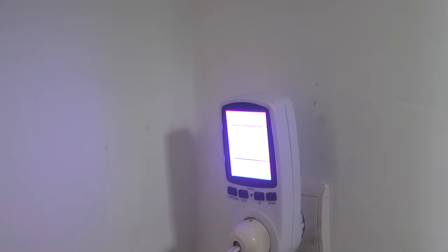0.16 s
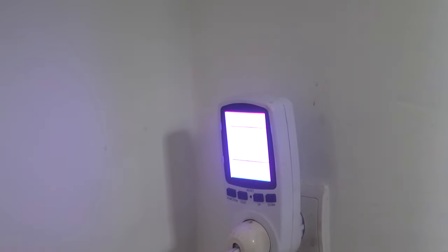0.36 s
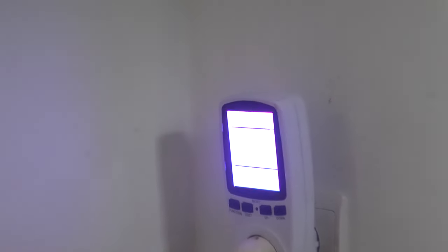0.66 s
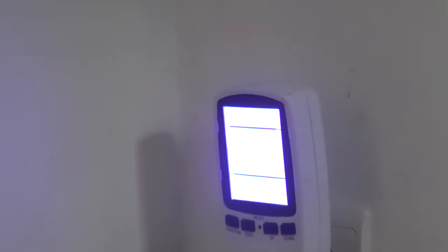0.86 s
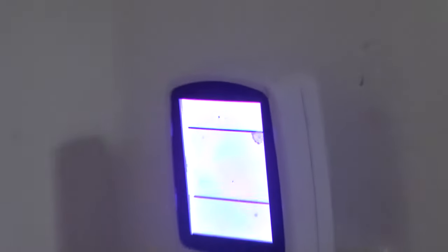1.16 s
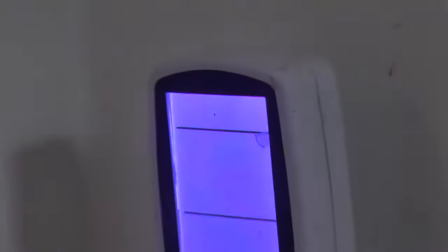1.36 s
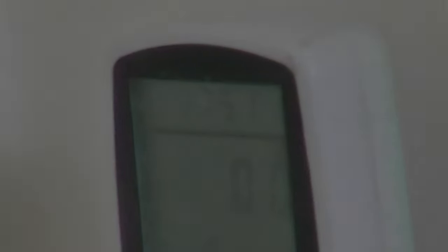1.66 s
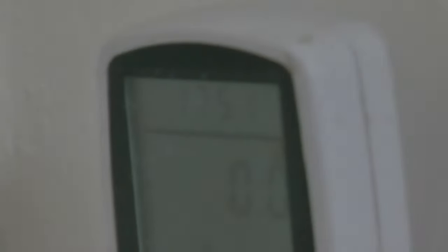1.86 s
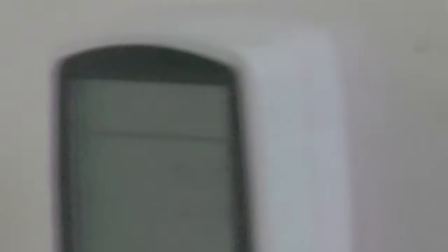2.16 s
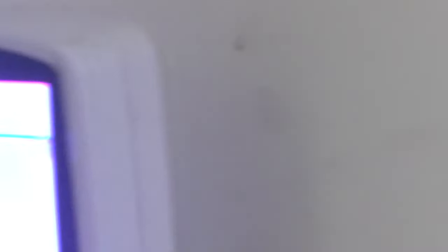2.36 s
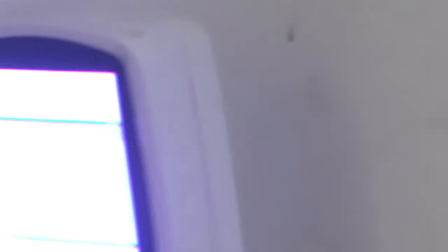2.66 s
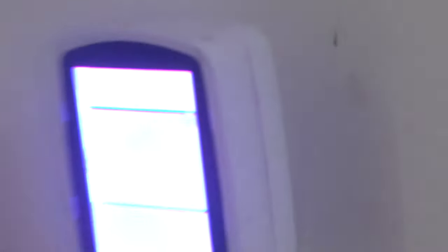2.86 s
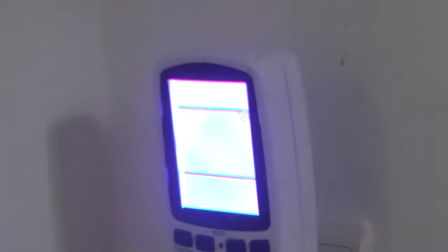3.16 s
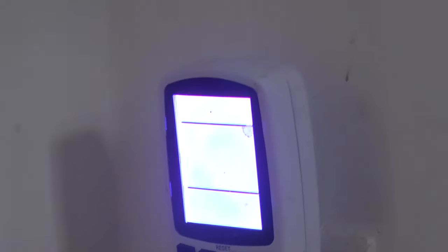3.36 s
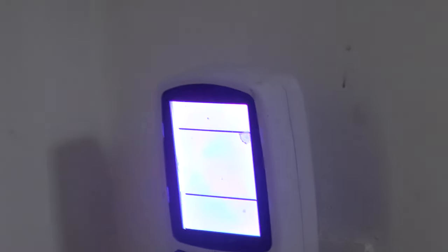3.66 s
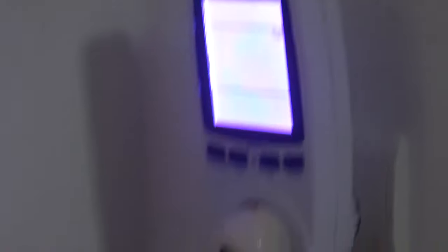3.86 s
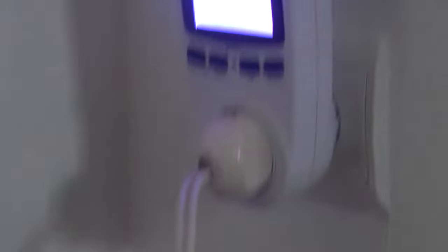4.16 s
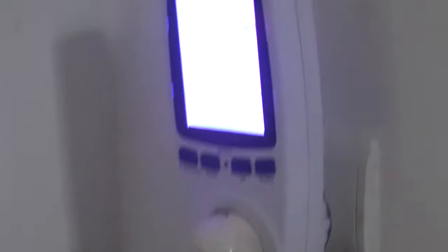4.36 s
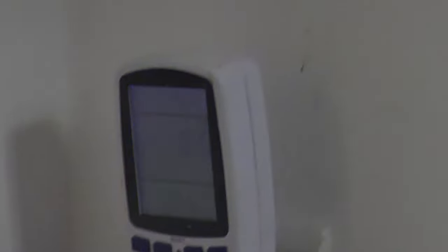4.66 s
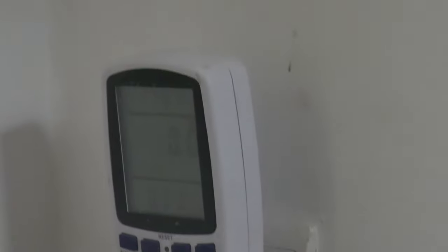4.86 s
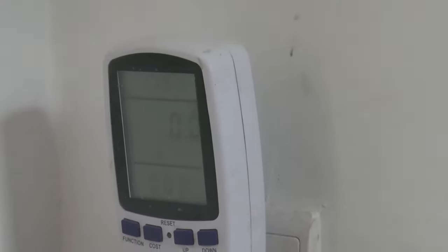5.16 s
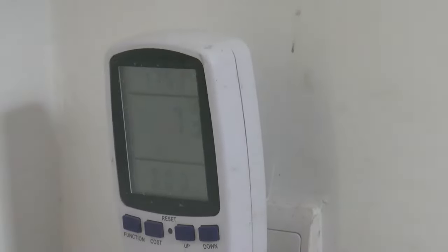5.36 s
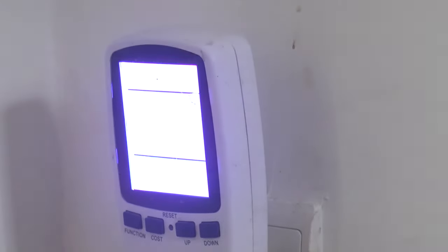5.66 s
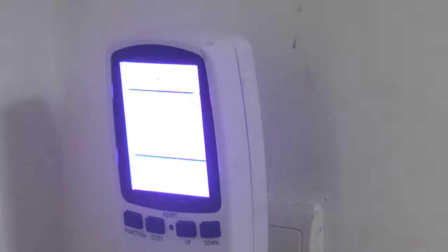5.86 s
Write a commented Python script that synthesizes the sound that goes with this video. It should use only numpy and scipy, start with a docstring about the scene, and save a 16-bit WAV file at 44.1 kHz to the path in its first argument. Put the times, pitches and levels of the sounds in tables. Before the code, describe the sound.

A high electrical whine sits over the steady hum and hiss of a small inverter fan indoors. Heard through a moving hand-held microphone, the whine grows louder, sinks away around the middle, then returns in uneven waves. Right at the microphone there is a soft thump at the start, a few brief plastic clicks, and later several muffled knocks from the hand, while the fan keeps running.

```python
"""A hollow drone, an airy hiss and a shrill whine: the small cooling fan of a power inverter in a room.
Turbulent air hums in a corner, resonates in the case, hisses off the blades and rasps in the grille,
while blades and motor sing on multiples of the shaft speed. A hand-held camera drifts through the
standing waves of the whine, so each tone swells and fades on its own. The hand bumps the camera
softly, and its plastic shell clicks a few times."""
import sys
import numpy as np
from scipy import signal
from scipy.fft import rfft, irfft, next_fast_len
from scipy.io import wavfile
from scipy.ndimage import map_coordinates

SR = 44100
rng = np.random.default_rng(int(sys.argv[2]) if len(sys.argv) > 2 else 0)


def transcribe(signal):
    """Save signal, clipped to [-1, 1], as a 16-bit WAV file at the path in sys.argv[1]."""
    frames = np.atleast_2d(signal).T
    limited = np.clip(frames, -1, 1)
    pcm = np.round(limited * 32767).astype(np.int16)
    wavfile.write(sys.argv[1], SR, pcm)


N = 264996

# The rushing air behind both drone and hiss. Each row: time in seconds, drone level in dB.
AIRFLOW = [(0, -40.5), (1.1, -41.5), (1.6, -42.5), (2.1, -42.5), (2.5, -42), (3, -42.5), (3.6, -42),
           (4.6, -43), (5.4, -41.5), (6, -44.5)]
# The lower whine's standing wave at the moving microphone. Each row: time in seconds, fader in dB.
LOW_WHINE_SWELL = [(0.0, -41.5), (0.5, -43.5), (1.1, -50), (1.39, -45), (1.54, -58), (1.87, -36),
                   (2.12, -32.5), (2.23, -33.5), (2.41, -54), (2.63, -60.5), (3.85, -48), (4.05, -39.5),
                   (4.62, -49), (4.94, -35.5), (5.04, -39.5), (5.17, -53), (5.36, -47), (5.49, -50.5),
                   (5.62, -35), (6.01, -34)]
# The upper whine's own standing wave. Each row: time in seconds, fader in dB.
HIGH_WHINE_SWELL = [(0.0, -46), (0.17, -44.5), (1.42, -45.5), (1.76, -59), (1.96, -38.5), (2.19, -38),
                    (2.26, -41), (2.31, -55), (3.81, -54), (4.05, -39), (4.18, -39), (4.74, -45.5),
                    (4.84, -39.5), (5.29, -42), (5.62, -38), (5.74, -46), (6.01, -41)]


def amp(db):
    """Decibels to gain."""
    return 10 ** (np.asarray(db) / 20)


def unit(x):
    """x at rms 1."""
    return x / np.sqrt(np.mean(x ** 2) + 1e-20)


def along(points, hz):
    """Read a curve of (Hz, value) points on a log frequency axis."""
    f, v = np.transpose(points)
    return np.interp(np.log(hz + 1), np.log(f + 1), v)


def automation(points):
    """Join (seconds, value) points into one value per sample."""
    return np.interp(np.arange(N) / SR, *np.transpose(points))


def wobble(rate):
    """A smooth random curve, rate knots a second."""
    knots = rng.standard_normal(int(N * rate / SR) + 4)
    return map_coordinates(knots, [np.arange(N) * rate / SR])


def filtered(x, response):
    """Shape x with a complex frequency response."""
    size = next_fast_len(N + SR // 2)
    return irfft(rfft(x, size) * response(np.fft.rfftfreq(size, 1 / SR)), size)[..., :N]


def resonances(modes, f):
    """The complex response of each (centre Hz, width Hz, dB) mode."""
    return np.array([amp(db) * 1j * f * w / (c * c - f * f + 1j * f * w) for c, w, db in modes])


def lowpass(f, edge_hz, order):
    """Gain of a smooth low-pass."""
    return 1 / np.sqrt(1 + (f / edge_hz) ** (2 * order))


def wall(f, strength, delay_s=.002518):
    """A close surface sends back an inverted copy, which combs the sound."""
    return 1 - strength * np.exp(-2j * np.pi * f * delay_s)


def room(f, ripple_db, spacing_hz=35):
    """Many faint room reflections put a fine, steady ripple on the spectrum."""
    knots = rng.standard_normal(int(SR / 2 / spacing_hz) + 4)
    return amp(ripple_db * map_coordinates(knots, [f / spacing_hz]))


def rush(colour, flutter_db, width=1):
    """Coloured, fluttering stereo noise near rms 1; direct sound is narrower than room sound."""
    # The stereo image at full width. Each row: frequency in Hz, left-right likeness (1 is mono).
    likeness = [(40, 0.34), (150, 0.78), (350, 0.85), (700, 0.89), (1500, 0.83), (3000, 0.76), (5000, 1),
                (9000, 0.96), (15000, 0.98)]

    def mid_side(f):
        angle = width * np.arccos(np.clip(along(likeness, f), -1, 1)) / 2
        return colour(f) * np.array([np.cos(angle), np.sin(angle)])

    mid, side = filtered(rng.standard_normal((2, N)), mid_side)
    return unit(np.array([mid + side, mid - side])) * amp(flutter_db * wobble(14))


def cavity(modes, flutter_db):
    """Turbulence excites the low resonances of a hollow space."""
    colour = lambda f: np.linalg.norm(resonances(modes, f), axis=0) * lowpass(f, 810, order=30)
    return rush(colour, flutter_db)


def finger_contacts(release_s=.013, release_db=-5.5, release_pitch=0.586):
    """Each bump is a first touch, a press and a softer, lower release; yields (s, dB, Hz, t60 s)."""
    # Soft bumps of the hand. Each row: press time in seconds, level in dB, pitch in Hz, t60 in seconds,
    # lead of the first touch in seconds, its level against the press in dB.
    presses = [(.019, -21, 80, .08, .006, -8), (2.53, -37, 338, .06, .01, -5),
               (3.342, -23, 397, 0.077, 0.00964, -9), (3.701, -30, 215, 0.082, .006, -8),
               (3.83, -16.5, 308, 0.049, .011, -2.5), (3.927, -22.5, 238, .085, .036, -5.5),
               (4.121, -17.5, 340, 0.053, .015, -2), (4.274, -26, 299, 0.075, .016, -0.5),
               (5.021, -31, 330, .055, .038, -5)]
    for start, db, hz, t60, lead_s, touch_db in presses:
        yield max(start - lead_s, 0), db + touch_db, hz, t60
        yield start, db, hz, t60
        yield start + release_s, db + release_db, hz * release_pitch, t60


def hand_bumps(attack_s=0.002, thud_db=-7, knock_db=-28, scuff_db=-33, boom_db=-32, boom_t60=0.99):
    """A finger pushes the camera: a few low cycles, a thud, a faint knock and scuff, a lingering boom."""
    out, t = np.zeros((2, N + SR)), np.arange(SR // 2) / SR
    rise = (1 - np.exp(-t / attack_s)) ** 2

    def band(low_hz, high_hz, order, width=0.46):
        """Stereo noise of rms 1 between two edges."""
        sos = signal.butter(order, [low_hz, high_hz], "band", fs=SR, output="sos")
        mid, side = signal.sosfilt(sos, rng.standard_normal((2, SR)))[:, -len(t):]
        return unit(np.array([mid + width * side, mid - width * side]))

    for start, db, hz, t60 in finger_contacts():
        fade = rise * amp(-60 * t / t60)
        # a slower, lower push carries less treble
        thud = amp(thud_db) * band(51, max(1.505 * hz, 90), order=4)
        knock = amp(knock_db) * band(1290, 1480, order=2)
        scuff = amp(scuff_db) * band(1000, 5000, order=1)
        push = 0.67 * np.sin(2 * np.pi * hz * t) + thud + hz / 350 * (knock + scuff)
        boom = rise * amp(boom_db - 60 * t / boom_t60) * band(60, 118, order=2)
        out[:, round(start * SR):][:, :len(t)] += amp(db) * (push * fade / fade.max() + boom)
    return out[:, :N]


def shell_clicks(crackle_db=-14, crackle_t60=0.013, contact_hz=7000, shelf_hz=8000):
    """Each snap is a short dry crackle that rings the plastic shell for a few milliseconds."""
    # Snaps of the plastic. Each row: start in seconds, peak before shelf and pan in dB,
    # shell ring in dB, treble shelf in dB, left over right in dB.
    snaps = [(.333, -31, -4, -8, 0), (.365, -17, 0, -8, 4), (1.731, -12.5, 13, 0, -2),
             (3.203, -27, 0, -2, 0), (3.2062, -19, 4, -2, 0), (3.365, -39, 0, 14, 0)]
    # The camera shell's modes. Each row: centre in Hz, width in Hz, relative level in dB.
    shell_modes = [(640, 400, -10), (1090, 120, -13), (1420, 130, -7), (3770, 600, 3), (4900, 550, 0),
                   (9100, 700, -5), (11400, 1000, -10)]
    out, t = np.zeros((2, N)), np.arange(SR // 20) / SR
    ring = lambda f: sum((-1) ** k * mode for k, mode in enumerate(resonances(shell_modes, f)))
    contact = lambda f: .5 * lowpass(f, contact_hz, order=2)
    crackle_fade = amp(crackle_db - 60 * t / crackle_t60)
    for start, db, ring_db, shelf_db, pan_db in snaps:
        snap, onset = np.zeros(N), round(start * SR)
        snap[onset:][:len(t)] = crackle_fade * rng.standard_normal(len(t))
        snap[onset] = 1
        shell = lambda f: amp(ring_db) * ring(f) * lowpass(f, 9300, order=7)
        click = filtered(snap, lambda f: (contact(f) + shell(f)) * wall(f, strength=0.46))
        click *= amp(db) / np.abs(click).max()
        click = filtered(click, lambda f: amp(shelf_db * (1 - lowpass(f, shelf_hz, order=6))))
        out += amp([[pan_db / 2], [-pan_db / 2]]) * click
    return out


def corner_hum():
    """Turbulence hums low in the corner around the inverter."""
    # The corner's resonances. Each row: centre in Hz, width in Hz, relative level in dB.
    corner_modes = [(208, 26, -13.5), (261, 34, -5), (341.4, 20.8, 4.5), (412, 11, -12)]
    # The hum's slow drift. Each row: time in seconds, level in dB.
    hum_swell = [(0, -45.5), (1.1, -42.5), (2.1, -49), (2.6, -46), (3.7, -46.5), (4.8, -50), (6, -48)]
    return amp(automation(hum_swell)) * cavity(corner_modes, flutter_db=1.63)


def case_drone():
    """Rushing air draws a hollow drone from the case."""
    # Resonances of the case and its air path. Each row: centre in Hz, width in Hz, relative level in dB.
    case_modes = [(546.3, 10.3, -2.5), (626, 17, -4.5), (674.4, 24, 0), (725.5, 14, 5), (760, 20, 0.5)]
    return amp(automation(AIRFLOW)) * cavity(case_modes, flutter_db=0.6)


def blade_hiss(trim_db=-3, treble_hz=6500):
    """Air hisses off the blades, coloured by wall and room; its top shifts as the microphone turns."""
    # The colour of the hiss. Each row: frequency in Hz, relative noise density in dB.
    hiss_colour = [(300, -6.5), (850, -1.5), (1080, 6.5), (1240, -5.5), (1420, 2.5), (1600, 4.5), (2200, 5),
                   (2950, 4), (3500, 7), (4200, -3), (6200, -2.5), (9000, -8.5), (12200, -20.5),
                   (15700, -28.5)]
    # Brightness as the microphone's aim wanders. Each row: time in seconds, treble gain in dB.
    treble_ride = [(0, -2.5), (.6, -1.5), (2.1, 4.5), (3.7, 1.5), (5.4, 2), (6, 5)]
    colour = lambda f: amp(along(hiss_colour, f)) * wall(f, strength=.62) * room(f, ripple_db=1.5)
    hiss = amp(automation(AIRFLOW) + trim_db) * rush(colour, flutter_db=0.65)
    dull = filtered(hiss, lambda f: lowpass(f, treble_hz, order=4))
    return dull + amp(automation(treble_ride)) * (hiss - dull)


def rasp_level(trim_db=-8, follow_low=0.7, follow_high=0.5):
    """The rasp is loudest where both whine tones are loudest; dB per sample."""
    low_db, high_db = automation(LOW_WHINE_SWELL), automation(HIGH_WHINE_SWELL)
    dip_db = follow_low * (low_db - low_db.max()) + follow_high * (high_db - high_db.max())
    return low_db.max() + trim_db + dip_db


def grille_rasp():
    """Turbulence in the grille makes a broad rasp, almost mono."""
    # The colour of the rasp. Each row: frequency in Hz, relative noise density in dB.
    rasp_colour = [(1200, -26), (1600, -11), (1800, 4), (2050, -4.5), (2450, 0), (2620, -3.5), (2800, -4),
                   (3300, -6.5), (3800, -6), (4300, -16), (6000, -10), (10000, -38), (15000, -60)]
    colour = lambda f: amp(along(rasp_colour, f)) * wall(f, strength=0.17)
    return amp(rasp_level()) * rush(colour, flutter_db=0.7, width=0.12)


def whine_halo(trim_db=-9, centre_hz=1926, width_hz=164):
    """Noise close to the lower whine tone shares its standing wave and swells with it."""
    colour = lambda f: resonances([(centre_hz, width_hz, 0)], f)[0] ** 2
    return amp(automation(LOW_WHINE_SWELL) + trim_db) * rush(colour, flutter_db=1.8, width=0.12)


def shaft_tone(turns, multiple, level_db, shimmer_db, jitter_rad, room_db=-120):
    """One multiple of the shaft speed, shaken by turbulence; its room echo differs left and right."""
    phase = 2 * np.pi * (multiple * turns + rng.random()) + jitter_rad * (wobble(25) + wobble(110))
    direct = amp(level_db + shimmer_db * (wobble(18) + wobble(90))) * np.sin(phase)
    echo = amp(room_db + 1.8 * wobble(2.67)) * np.cos(phase + .5 * wobble(1.92))
    return np.sqrt(2) * np.array([direct + echo, direct - echo])


def fan_tones(low_gain_db=2.5, high_gain_db=3, top_gain_db=-11.5):
    """Five blades hum; the motor whines at 12, 16 and 20 times the shaft speed."""
    # The fan's slightly wavering speed. Each row: time in seconds, turns per second.
    shaft_speed = [(0, 159.4), (1.45, 159.6), (2.05, 160.5), (2.6, 159.9), (4, 160.05), (4.55, 159.9),
                   (5.3, 161), (5.6, 160.5), (6, 160.4)]
    # The blade tone's rise and fall. Each row: time in seconds, level in dB.
    blade_swell = [(0, -41), (1.45, -43), (1.8, -57), (2.35, -61), (2.65, -48.5), (3.8, -50.5), (4.65, -57),
                   (5.1, -49), (5.5, -48), (6, -56)]
    # Faint tones around the whine. Each row: multiple of the shaft speed, average level in dB.
    faint_tones = [(1, -62), (24, -57.5), (28, -62), (33, -71)]
    turns = np.cumsum(automation(shaft_speed)) / SR
    low_db = automation(LOW_WHINE_SWELL) + low_gain_db
    high_db = automation(HIGH_WHINE_SWELL) + high_gain_db
    out = shaft_tone(turns, 5, automation(blade_swell), shimmer_db=1.05, jitter_rad=0.22, room_db=-55.5)
    out += shaft_tone(turns, 12, low_db, shimmer_db=0, jitter_rad=0.075, room_db=-55.5)
    out += shaft_tone(turns, 16, high_db, shimmer_db=0.78, jitter_rad=0.054, room_db=-60.5)
    out += shaft_tone(turns, 20, rasp_level() + top_gain_db, shimmer_db=1, jitter_rad=.12)
    # the faint tones partly follow the upper whine
    swing_db = 0.17 * (high_db - high_db.mean())
    for multiple, db in faint_tones:
        out += shaft_tone(turns, multiple, db + swing_db + 1.2 * wobble(2), shimmer_db=1.7, jitter_rad=.25)
    return out


def scene():
    """The fan in front, the handling right at the microphone."""
    fan = fan_tones() + corner_hum() + case_drone() + blade_hiss() + grille_rasp() + whine_halo()
    return fan + shell_clicks() + hand_bumps()


def record(dry, bass_hz=52, top_hz=15750):
    """The small microphone loses deep bass, and the camera keeps nothing above its band limit."""
    return filtered(dry, lambda f: (1 - lowpass(f, bass_hz, order=2)) * (f < top_hz))


dry = scene()
out = record(dry)
transcribe(out)
```